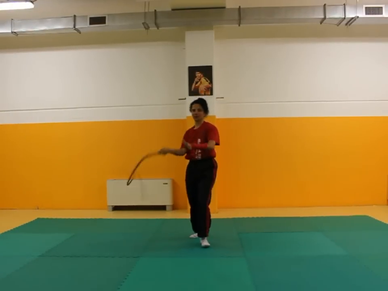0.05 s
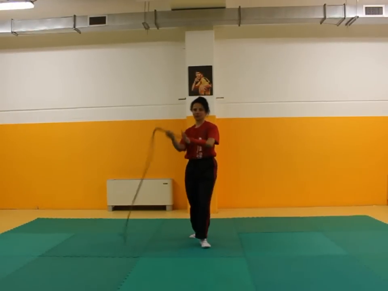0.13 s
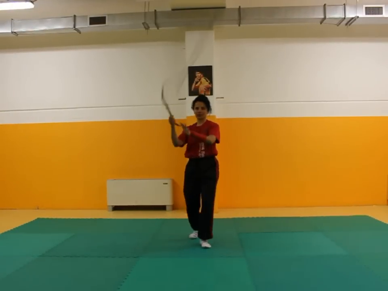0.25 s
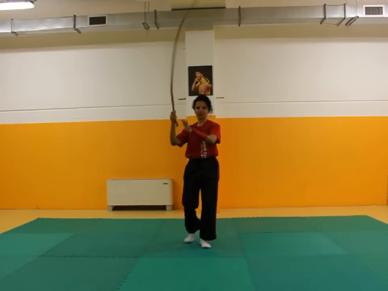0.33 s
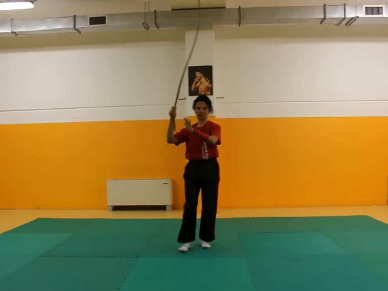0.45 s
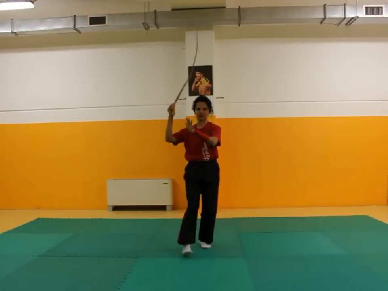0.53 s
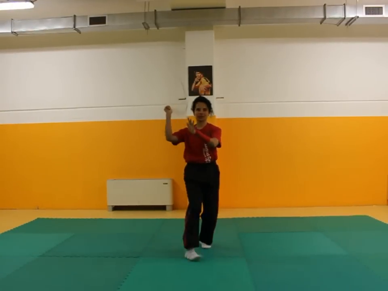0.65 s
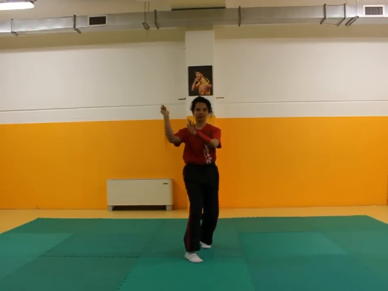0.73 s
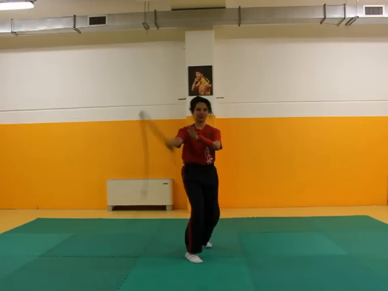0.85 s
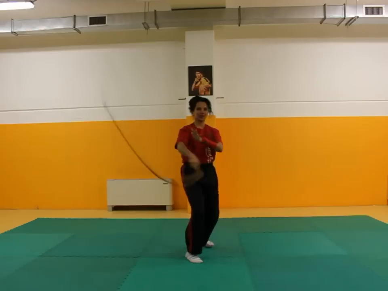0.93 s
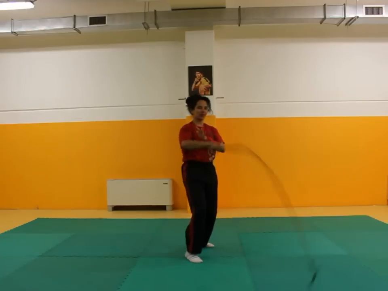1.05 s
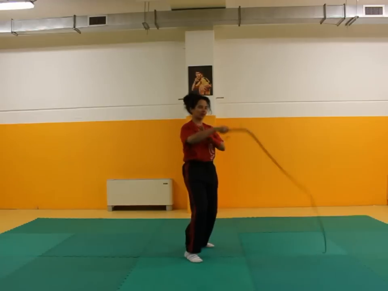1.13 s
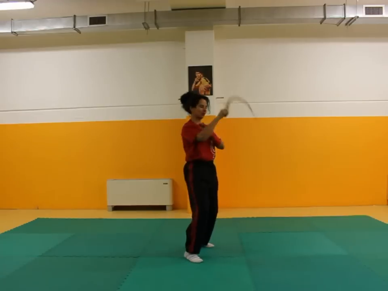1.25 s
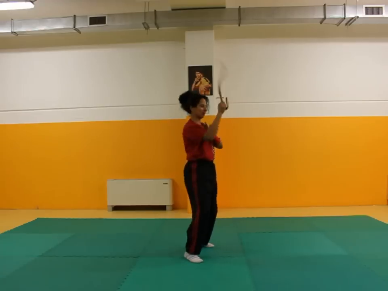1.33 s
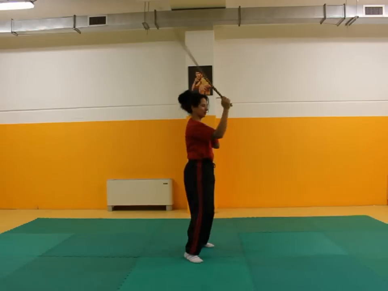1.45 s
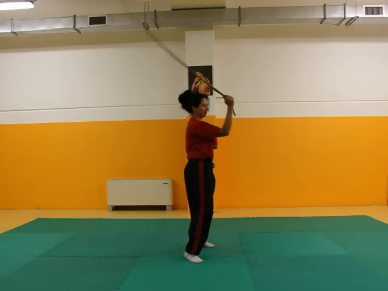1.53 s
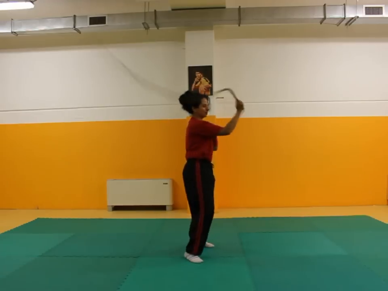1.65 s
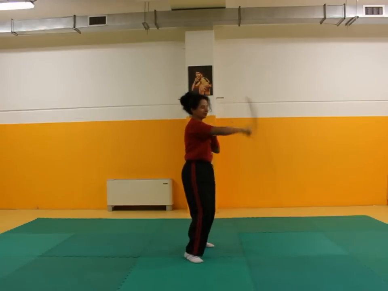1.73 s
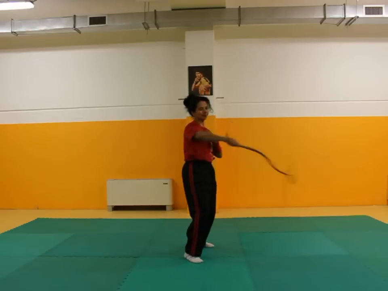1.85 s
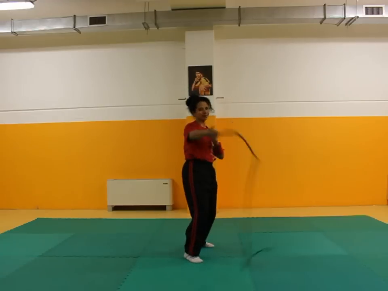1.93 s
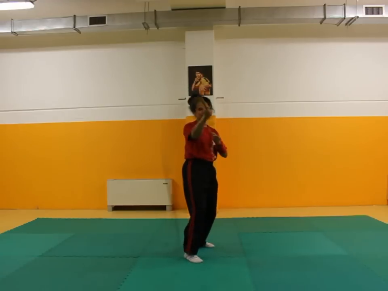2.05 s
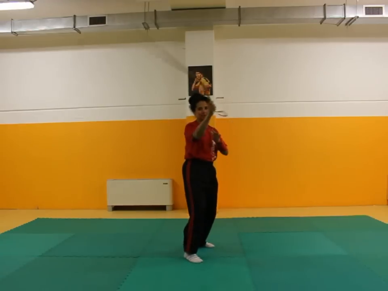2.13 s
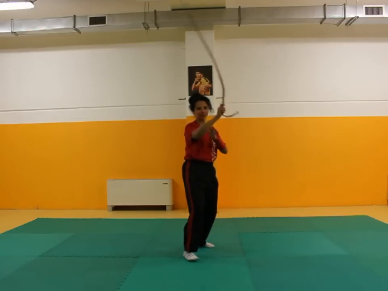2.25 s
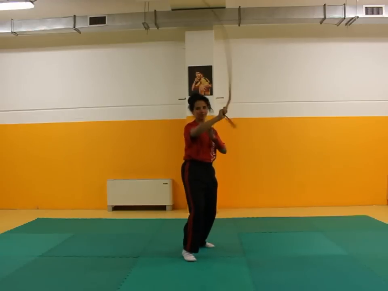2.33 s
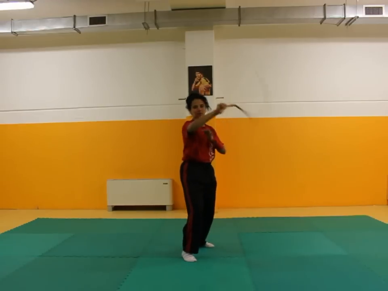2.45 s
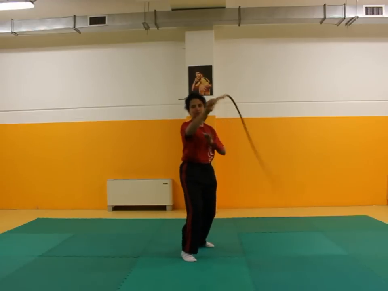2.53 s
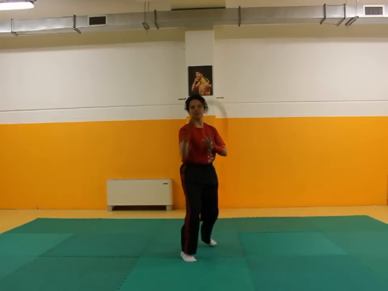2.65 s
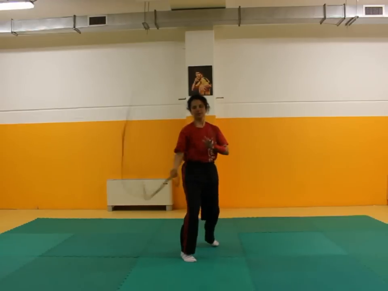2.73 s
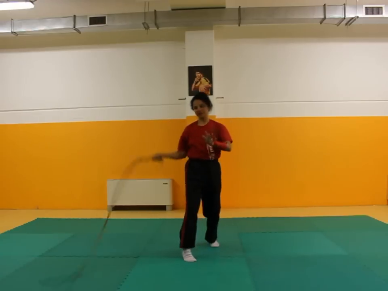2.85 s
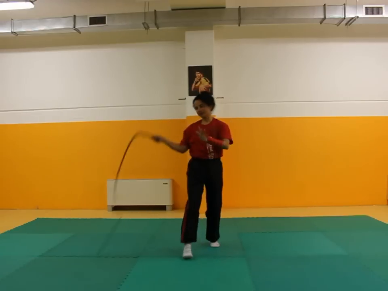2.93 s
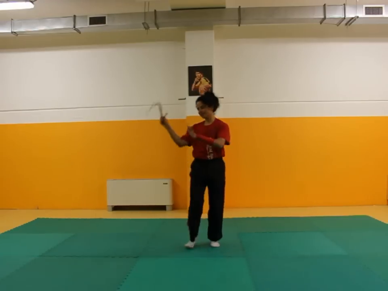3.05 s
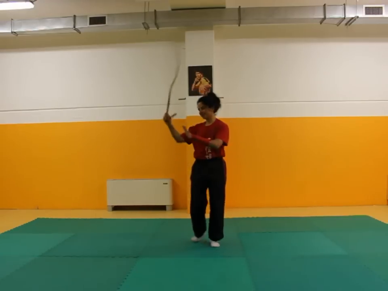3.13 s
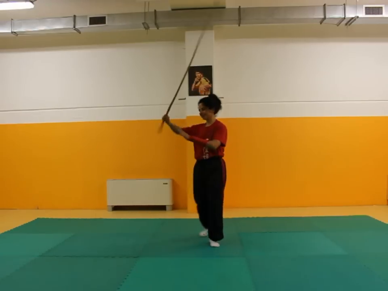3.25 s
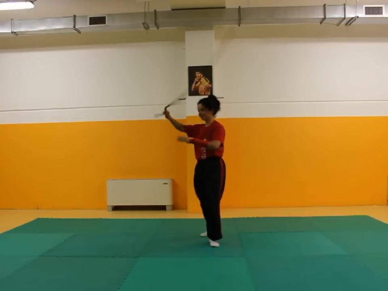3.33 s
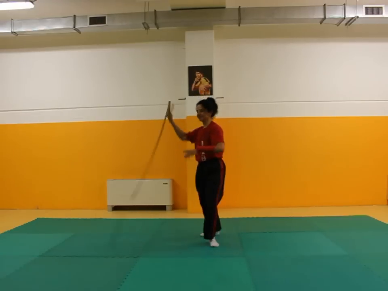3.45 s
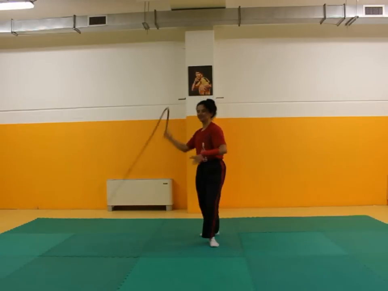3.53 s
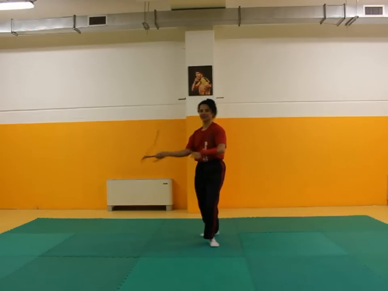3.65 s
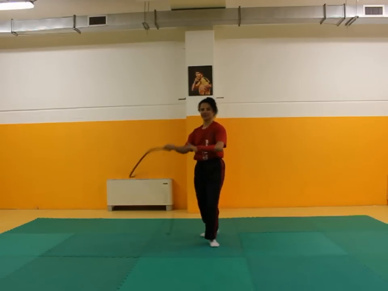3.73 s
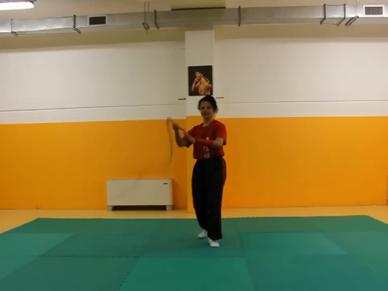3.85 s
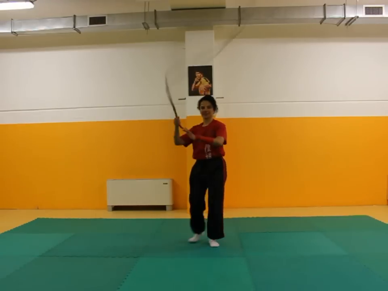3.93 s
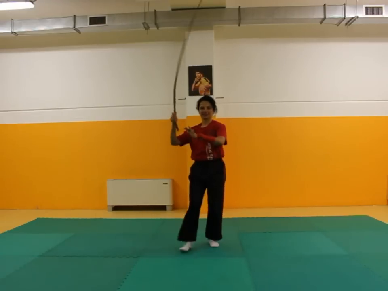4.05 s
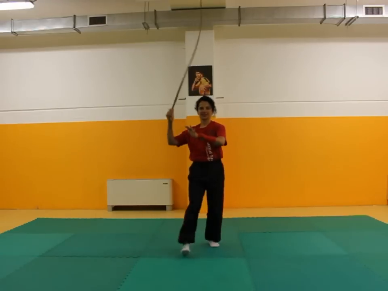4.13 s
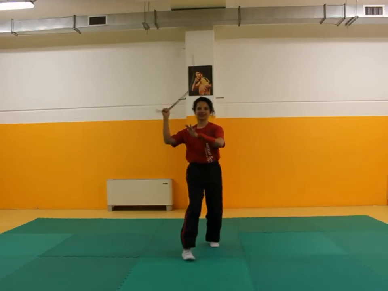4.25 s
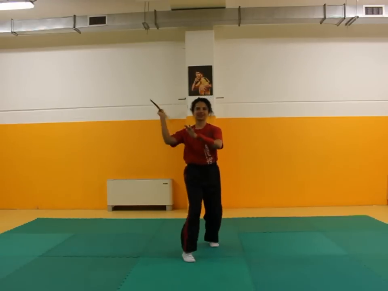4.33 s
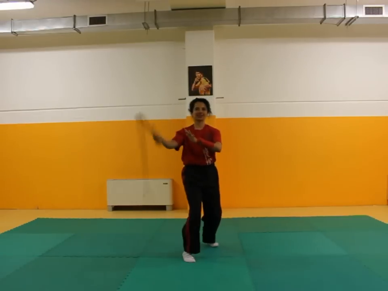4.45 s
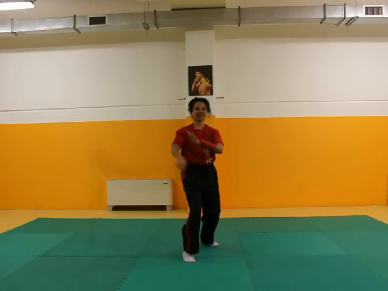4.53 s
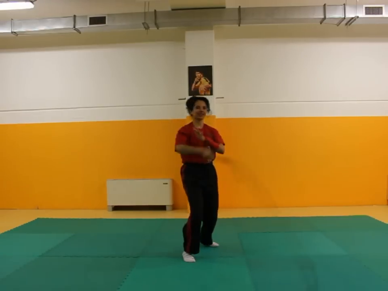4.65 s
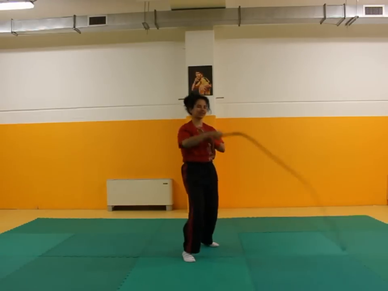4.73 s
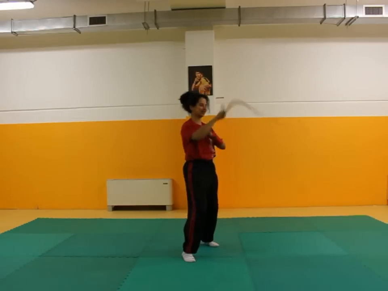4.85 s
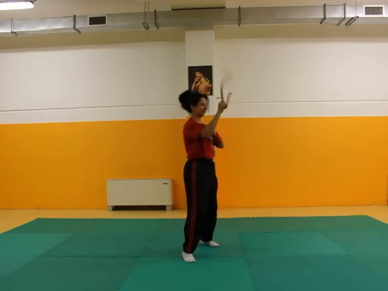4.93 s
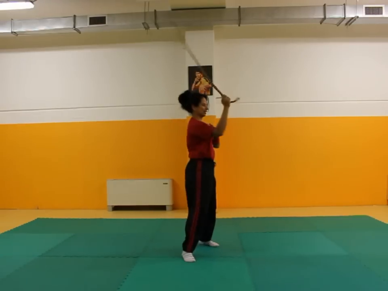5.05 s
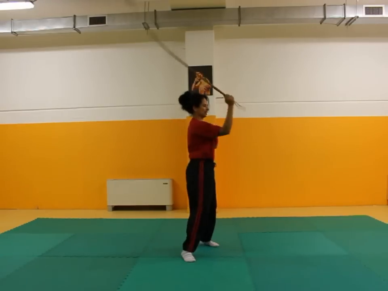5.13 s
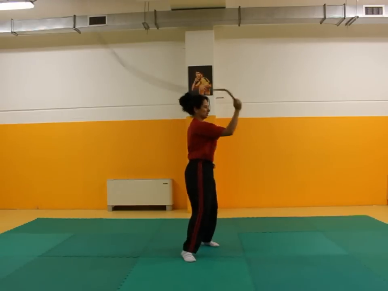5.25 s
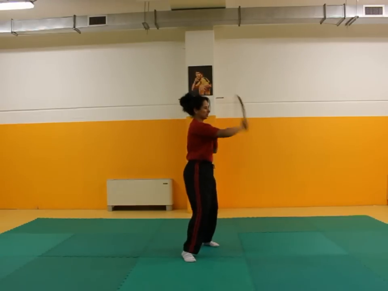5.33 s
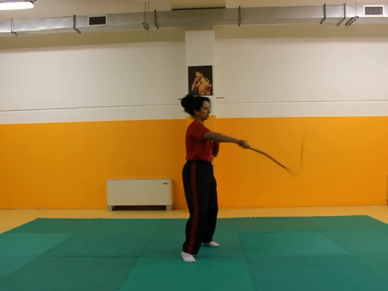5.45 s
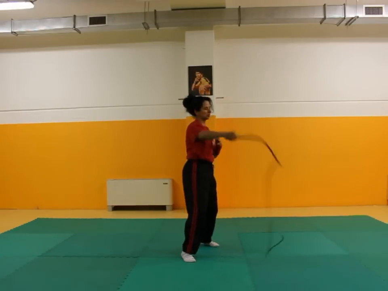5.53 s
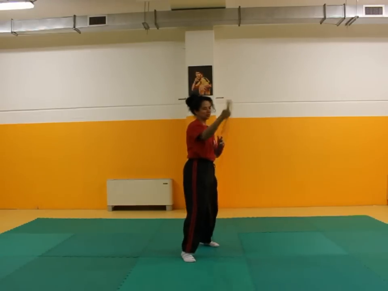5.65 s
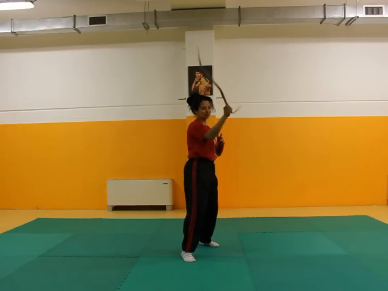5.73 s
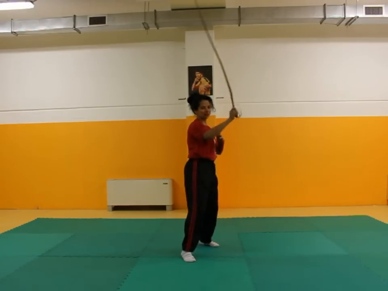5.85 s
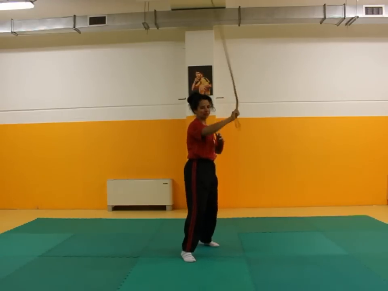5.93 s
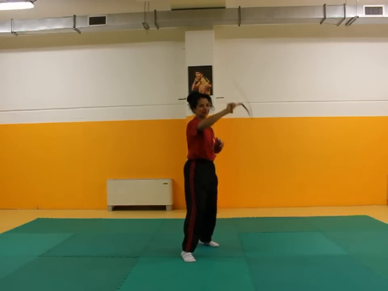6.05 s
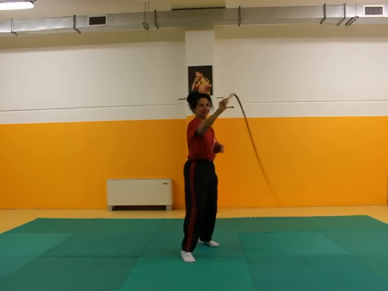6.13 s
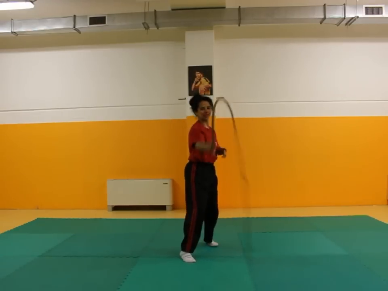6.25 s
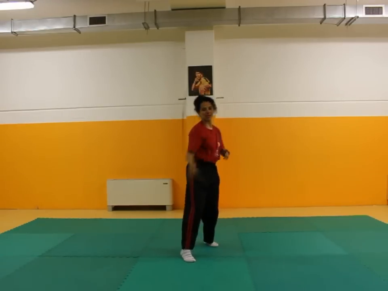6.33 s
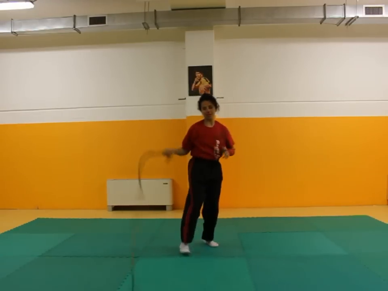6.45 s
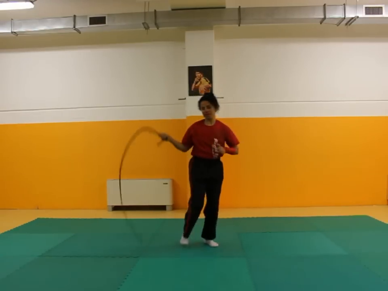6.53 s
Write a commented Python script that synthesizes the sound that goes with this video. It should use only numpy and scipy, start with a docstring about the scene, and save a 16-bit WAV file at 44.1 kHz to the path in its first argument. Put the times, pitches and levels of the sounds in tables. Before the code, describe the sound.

Sharp, overloaded whip cracks repeat steadily in a large echoing gym, with low whooshes between them and the lash slapping a hollow mat.

```python
"""A bullwhip cracks seven times in a bare, very live gym hall; its lash also slaps the mat.
Each crack sums N-shaped shocks and bounces, tearing noise, a soft air thump and separate wall echoes.
The hall is noise in bands, each with its own decay; swings, brushing and ventilation are coloured noise.
The shocks overload a small recorder, whose gain control ducks the hall, then lets it swell back."""
import sys
import numpy as np
from scipy import signal
from scipy.fft import rfft, irfft
from scipy.io import wavfile
from scipy.ndimage import minimum_filter1d

SR = 44100
rng = np.random.default_rng(int(sys.argv[2]) if len(sys.argv) > 2 else 0)


def transcribe(signal):
    """Save signal, clipped to [-1, 1], as a 16-bit WAV file at the path in sys.argv[1]."""
    frames = np.atleast_2d(signal).T
    limited = np.clip(frames, -1, 1)
    pcm = np.round(limited * 32767).astype(np.int16)
    wavfile.write(sys.argv[1], SR, pcm)


N = 291060
TIME = np.arange(N) / SR
BIN_HZ = np.maximum(np.arange(N // 2 + 1) * SR / N, 1)
BAND_HZ = np.geomspace(30, 17000, 38)


def from_db(db):
    """Decibels to amplitude gain."""
    return 10 ** (np.asarray(db) / 20)


def at_hz(points, hz):
    """Read a table on a log-frequency axis."""
    knots, values = np.transpose(points)
    return np.interp(np.log(hz), np.log(knots), values)


def fade(x, seconds):
    """Every sample of x dies away exponentially."""
    return signal.lfilter([1], [1, -np.exp(-1 / (seconds * SR))], x + 1e-18)


def smooth(x, seconds):
    """One-pole average."""
    return fade(x, seconds) * (1 - np.exp(-1 / (seconds * SR)))


def cut(x, hz, kind, order=2):
    """Butterworth low- or high-pass."""
    sections = signal.butter(order, min(hz, SR / 2 - 100), kind, fs=SR, output="sos")
    return signal.sosfilt(sections, x + 1e-18)


def noise(colour):
    """Coloured noise of rms 1."""
    spectrum = rfft(rng.standard_normal(N)) * from_db(at_hz(colour, BIN_HZ))
    x = irfft(spectrum, N)
    return x / x.std()


def add(out, s, sound):
    """Mix a short sound in at time s."""
    start = max(round(s * SR), 0)
    out[start:start + len(sound)] += sound[:N - start]


# Ventilation spectrum. Each row: frequency in Hz, relative level in dB per Hz.
VENT_SPECTRUM = [(25, -26), (50, -2.5), (90, -12), (170, -5.5), (350, -11), (700, -18.5), (2000, 1.5),
                 (6000, -18), (16000, -89)]


def ventilation(level_db=-32):
    """Steady coloured noise of moving air."""
    return from_db(level_db) * noise(VENT_SPECTRUM)


# Blow spectrum fed to the hall. Each row: frequency in Hz, relative level in dB per Hz.
BLOW_SPECTRUM = [(40, -44), (90, -34.5), (160, -15.5), (350, -12), (750, -11.5), (1200, -4.5), (2000, -3.5),
                 (3200, -2), (5000, -3), (6500, -5.5), (8500, -10), (12000, -11.5), (16000, -21)]


def band_powers(levels_db, tilts_db_per_octave):
    """Power per Hz that each blow gives to each band: bands x blows."""
    rms = np.sqrt(np.mean(from_db(at_hz(BLOW_SPECTRUM, BIN_HZ)) ** 2))
    shape = from_db(at_hz(BLOW_SPECTRUM, BAND_HZ)) / rms
    octaves = np.log2(BAND_HZ / 3000)[:, None]
    return (shape[:, None] * from_db(levels_db + octaves * tilts_db_per_octave)) ** 2


# Hall reverberation time. Each row: frequency in Hz, time to fall 60 dB in seconds.
HALL_DECAY = [(100, 3.27), (400, 2.23), (900, 1.84), (2000, 2.205), (3200, 1.89), (5000, 1.408),
              (8000, 0.77), (11000, 0.41), (16000, 0.23)]


def hall(build_s=0.0076, slap_tilt_db_per_octave=0.28, earlier_db=-22):
    """Cracks and slaps fill the hall with diffuse sound; the air swallows the treble first."""
    blows = [(s, db, tilt) for s, *_, db, tilt in CRACKS]
    blows += [(s, db, slap_tilt_db_per_octave) for s, db, _ in SLAPS]
    times, levels_db, tilts = np.transpose(blows)
    powers = band_powers(levels_db, tilts)
    earlier = band_powers(earlier_db, slap_tilt_db_per_octave)
    white, out = rfft(rng.standard_normal(N)), np.zeros(N)
    place = np.interp(np.log(BIN_HZ), np.log(BAND_HZ), np.arange(len(BAND_HZ)))
    for k, hz in enumerate(BAND_HZ):
        feed = np.zeros(N)
        feed[(times * SR).astype(int)] = powers[k]
        feed = smooth(smooth(feed, build_s), build_s)  # the echoes take a moment to multiply
        feed[0] += earlier[k, 0]  # still ringing from an earlier stroke
        energy = fade(feed, at_hz(HALL_DECAY, hz) / np.log(10 ** 6))
        band = irfft(white * np.maximum(1 - abs(place - k), 0), N)
        out += np.sqrt(energy) * band
    return out


def flutter(depth_rms_db=0.69, rate_hz=11):
    """A gain that wavers a little at random, as the reverberation does."""
    slow = cut(rng.standard_normal(N), rate_hz, "low")
    return from_db(depth_rms_db * slow / slow.std())


def strokes(rows, colour, linger_s, wet):
    """Noise that swells and sinks with each movement and lingers in the hall."""
    power = sum(from_db(db) ** 2 * np.exp(-((TIME - s) / half) ** 2) for s, db, half in rows)
    return np.sqrt(power + wet * smooth(power, linger_s)) * noise(colour)


# Thong sweeping through the air. Each row: centre in seconds, level in dB, half length in seconds.
SWINGS = [(.48, -35, 0.56), (.87, -29, 0.031), (1.76, -34.5, 0.11), (2.67, -38, 0.052), (3.59, -39.5, 0.11),
          (4.47, -37, 0.25), (5.0, -32, 0.13), (5.37, -35, 0.097), (6.29, -42, 0.32)]
# Swing spectrum. Each row: frequency in Hz, relative level in dB per Hz.
SWING_SPECTRUM = [(30, -20), (100, -3.5), (200, 0), (360, 7), (600, -5), (1500, -10.5), (6000, -17),
                  (16000, -105)]


def swings():
    """The thong rushes through the air: low, broad noise."""
    return strokes(SWINGS, SWING_SPECTRUM, linger_s=0.1, wet=1.0)


# Lash slapping the mat. Each row: start in seconds, bright smack in the hall in dB, hollow pop in dB.
SLAPS = [(0.023, -15, -50), (0.043, -18.5, -15.5), (0.089, -14, -20), (0.121, -37, -11.5),
         (3.725, -17, -30), (3.805, -18.5, -26), (6.389, -18, -16), (6.45, -22, -19.5)]
# Pop spectrum. Each row: frequency in Hz, relative level in dB per Hz.
POP_SPECTRUM = [(100, -53), (450, -15.5), (590, -10.5), (700, -4), (800, -6.5), (900, -4), (1100, -18),
                (2500, -24), (16000, -63)]


def mat_pops(near_s=0.017, hall_s=0.14, wet=0.17, hall_pitch=0.888):
    """The mat answers each slap with a hollow pop; a lower-pitched part hangs on in the hall."""
    hits = np.zeros(N)
    for s, _, db in SLAPS:
        add(hits, s, from_db([db]) ** 2)
    near = noise(POP_SPECTRUM)
    far = noise([(hz * hall_pitch, db) for hz, db in POP_SPECTRUM])
    return np.sqrt(fade(hits, near_s)) * near + np.sqrt(wet * fade(hits, hall_s)) * far


# Shoes and clothes brushing. Each row: centre in seconds, level in dB, half length in seconds.
BRUSHES = [(.44, -31.5, 0.086), (.84, -39, 0.058), (2.59, -37, 0.025), (4.368, -34, 0.0095),
           (4.47, -38, 0.083), (5.18, -33, 0.012), (5.34, -37, 0.029), (6.15, -35, 0.0093)]
# Brush spectrum. Each row: frequency in Hz, relative level in dB per Hz.
BRUSH_SPECTRUM = [(100, -21), (1000, 16.5), (4000, 6.5), (9000, -4), (13000, -4.5), (16000, -31)]


def brushes():
    """Shoes and clothes rub: brief, brighter noise."""
    return strokes(BRUSHES, BRUSH_SPECTRUM, linger_s=0.051, wet=0.23)


def n_wave(ms):
    """A sonic boom: a jump up, a straight fall through zero, a jump back."""
    phase = np.arange(SR // 200) / (max(ms, .05) * SR / 1000)
    return (1 - 2 * phase) * np.clip((1 - phase) / phase[1], 0, 1)


# Whip cracks, also feeding hall, echoes and thumps. Each row: start in seconds, shock in dB,
# shock length in ms, tearing in dB, tearing length in seconds, gap between bounces in seconds,
# first bounce in dB, loss at each further bounce in dB, air thump in dB, thump rise in seconds,
# hall in dB, hall brightness in dB per octave.
CRACKS = [(0.9023, 36, 0.44, 1, 0.0024, .0064, 34, 10, 10, 0.0017, 11.5, 1),
          (1.8022, 16.5, 0.17, 4, .0012, .0052, 25.5, 5, -11, .0044, 5.5, 1.4),
          (2.694, 20, 0.26, -4.5, 0.0029, .0060, 23.5, 9, 7, 0.0014, 4.5, 2),
          (3.6198, 23, 0.2, 0, 0.0037, 0.0036, 6, 5, 7, 0.00028, -5, 0.25),
          (4.5285, 24.5, 0.53, 3, 0.0044, 0.0072, 25.5, 5, 10, 0.0014, 6.5, 0.5),
          (5.4330, 11.5, 0.35, -10, 0.0012, .0058, 27, 1.5, -4.5, 0.00093, 7, 1.46),
          (6.3043, 3.5, 0.6, 0, 0.0037, 0.0056, 11.5, 3.5, -22, 0.0019, -9.5, 0)]


def shock_fronts(count=4, bounce_ms=0.33, bounce_shortens=0.66,
                 follower_s=.001, follower_db=-5, follower_shortens=0.63):
    """Each crack sheds a pair of fronts that bounce off near surfaces: rows (s, peak dB, length ms)."""
    arrivals = []
    for s, shock_db, ms, _, _, gap, bounce_db, loss_db, *_ in CRACKS:
        arrivals.append((s, shock_db, ms))
        for k in range(count):
            length_ms = bounce_ms * bounce_shortens ** k
            arrivals.append((s + (k + 1) * gap, bounce_db - k * loss_db, length_ms))
    followers = []
    for s, db, ms in arrivals:
        lag_s = follower_s * rng.uniform(.5, 2)
        followers.append((s + lag_s, db + follower_db, ms * follower_shortens))
    return arrivals + followers


def shocks(burst_hz=1200, crackle_db=-14, crackle_s=0.0021, hiss_db=-19, hiss_s=0.0078,
           rumble_db=-29, rumble_s=0.0072, rumble_hz=560, tear_lead_lengths=1.05):
    """The tip hisses up to speed, tears the air and sheds fronts, each trailing crackle and dull rumble."""
    fronts, tearing, rumbles = np.zeros((3, N))
    t = TIME[:SR // 20]

    def burst(db, envelope):
        return from_db(db) * envelope * rng.standard_normal(len(t))

    for s, db, ms in shock_fronts():
        add(fronts, s, from_db(db) * n_wave(ms))
        add(tearing, s, burst(db + crackle_db, np.exp(-t / crackle_s)))
        add(rumbles, s, burst(db + rumble_db, np.exp(-t / rumble_s)))
    for s, _, _, db, length, *_ in CRACKS:
        start = s - tear_lead_lengths * length
        swell = np.exp(-(t / length) ** 2) * np.minimum(2 * t / length, 1)
        add(tearing, start, burst(db, swell))
        add(tearing, start - t[-1], burst(hiss_db, np.exp(-t / hiss_s)[::-1]))
    rumbles = cut(cut(rumbles, rumble_hz, "low"), 140, "high")
    rumbles *= np.sqrt(SR / 2 / rumble_hz)  # make up for the power the low-pass removes
    bright = fronts + cut(tearing, burst_hz, "high", order=1)
    return cut(bright, 7900, "low", order=1) + rumbles


def air_thumps(lag_s=0.0013):
    """After each crack the displaced air arrives as a soft push and a weaker pull."""
    out = np.zeros(N)
    for s, *_, db, rise, _, _ in CRACKS:
        age = TIME[:SR // 10] / rise
        add(out, s + lag_s, from_db(db) * (1 - age / 2) * age * np.exp(1 - age))
    return out


def wall_echoes(echo_db=9, echo_s=0.29, spread_db=4, echo_ms=0.16, count=45):
    """Separate N-wave echoes of each crack come back at random delays, the later ones weaker."""
    out = np.zeros(N)
    for s, *_, hall_db, _ in CRACKS:
        delays = .008 + 0.075 * rng.random(count)
        levels_db = hall_db + echo_db + spread_db * rng.standard_normal(count)
        sizes = from_db(levels_db) * np.exp(-delays / echo_s)
        for delay, size in zip(delays, sizes):
            add(out, s + delay, size * n_wave(echo_ms))
    return cut(cut(out, 990, "high"), 6000, "low")


def scene():
    """Whip, hall, body movement and ventilation at one microphone."""
    background = ventilation() + hall() * flutter()
    movement = swings() + mat_pops() + brushes()
    cracks = shocks() + air_thumps() + wall_echoes()
    return (background + movement + cracks)[None]


def ducking(x, sense_s, threshold_db, most_db, hold_s, release_db_per_s, knee_db):
    """How far x stands above a threshold, in dB: held for a moment, then let go at a steady rate."""
    over = np.minimum(10 * np.log10(smooth(x ** 2, sense_s)) - threshold_db, most_db)
    half = int(hold_s * SR / 2)
    over = -minimum_filter1d(-over, 2 * half + 1, origin=half, mode="nearest")
    ramp = release_db_per_s * TIME
    held = np.maximum.accumulate(over + ramp) - ramp
    return knee_db * np.logaddexp(0, held / knee_db)  # soft knee


def gain_control(x, attack_s=0.0026, overreach=1.297):
    """A quick limiter catches shocks; a slow leveller ducks the hall too far, so it swells on release."""
    limiter = ducking(x, sense_s=0.0052, threshold_db=-11.5, most_db=26, hold_s=0.027,
                      release_db_per_s=88, knee_db=6.24)
    leveller = ducking(x, sense_s=0.023, threshold_db=-7.5, most_db=18.0, hold_s=0.085,
                       release_db_per_s=41.5, knee_db=4.8)
    reduction_db = smooth(np.maximum(limiter, overreach * leveller), attack_s)
    return x * from_db(-reduction_db)


def record(dry, cutoff_hz=16000):
    """Bass roll-off, gain control, hard overload on the shocks, and a steep top cut."""
    levelled = gain_control(cut(dry[0], 94, "high", order=1))
    clipped = np.clip(levelled, -.95, .95)
    top_cut = signal.ellip(10, .1, 70, cutoff_hz, fs=SR, output="sos")
    return signal.sosfilt(top_cut, clipped)[None]


dry = scene()
out = record(dry)
transcribe(out)
```